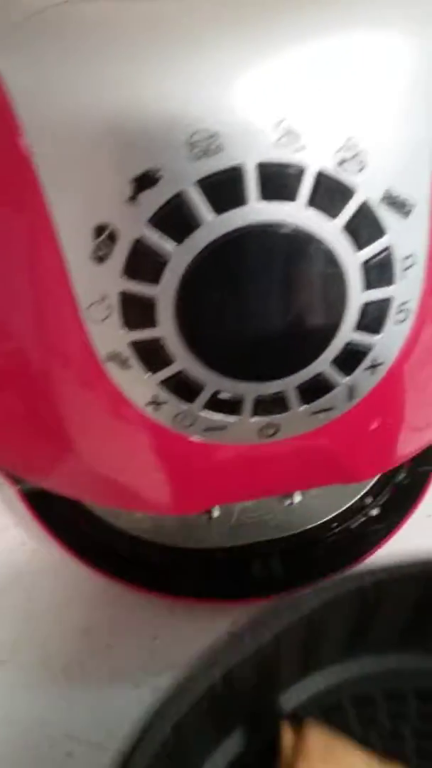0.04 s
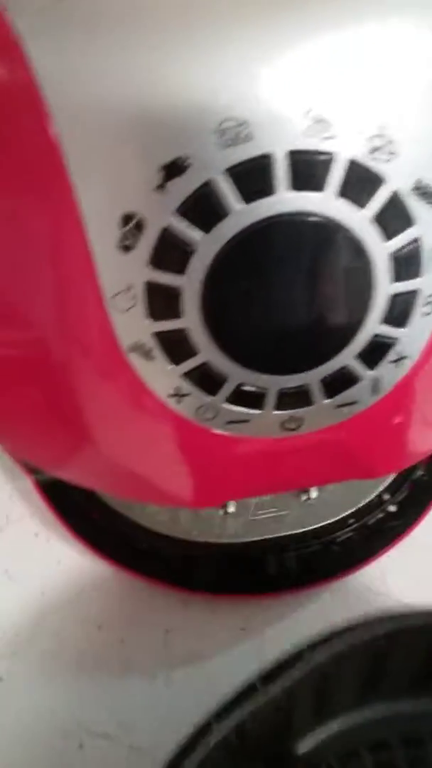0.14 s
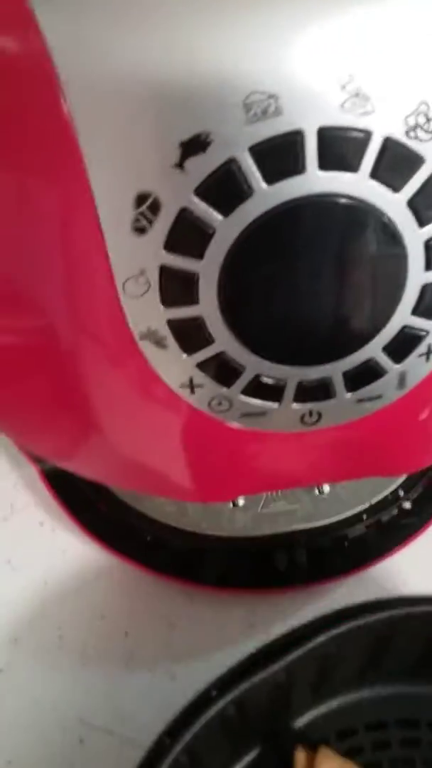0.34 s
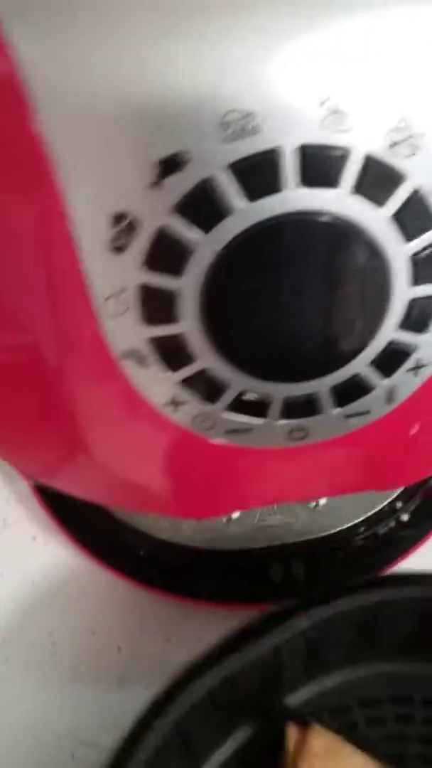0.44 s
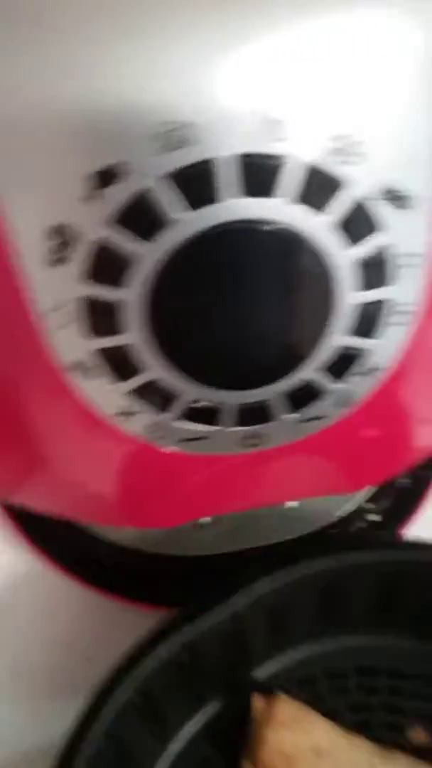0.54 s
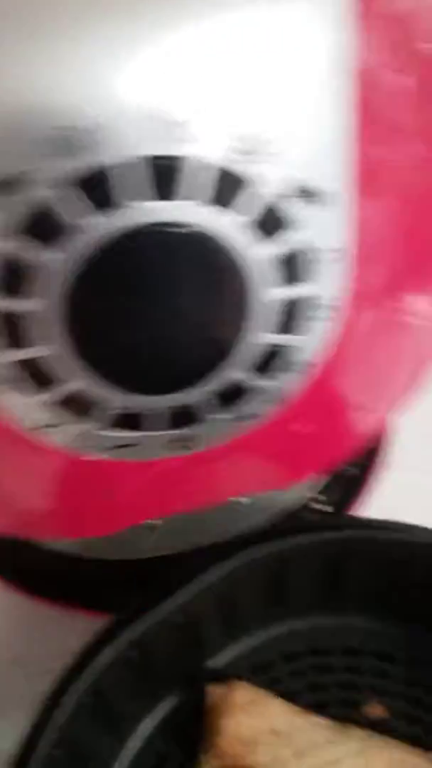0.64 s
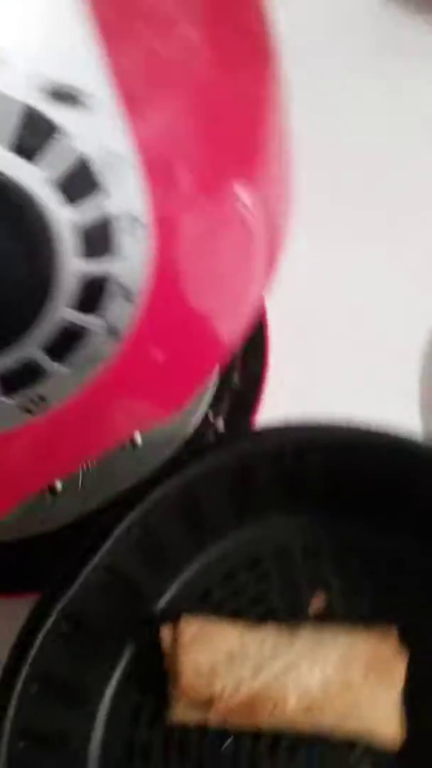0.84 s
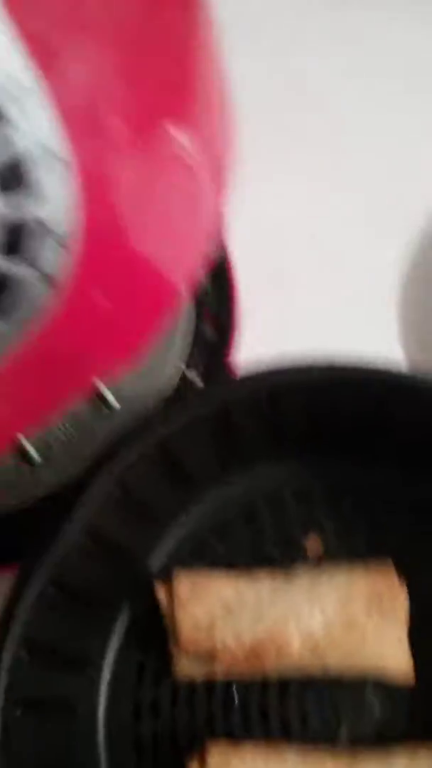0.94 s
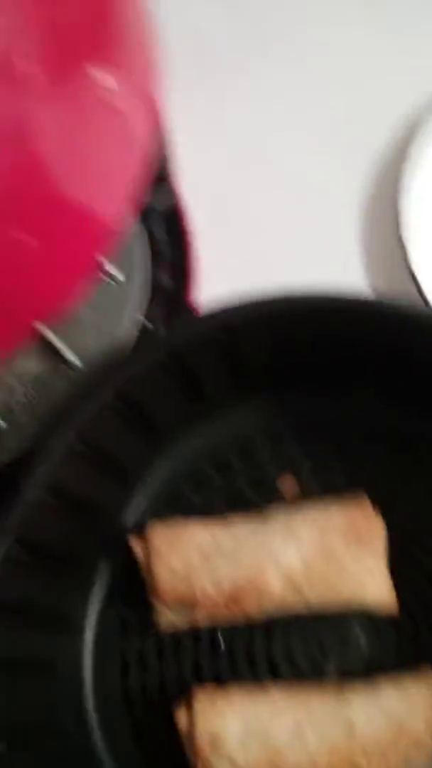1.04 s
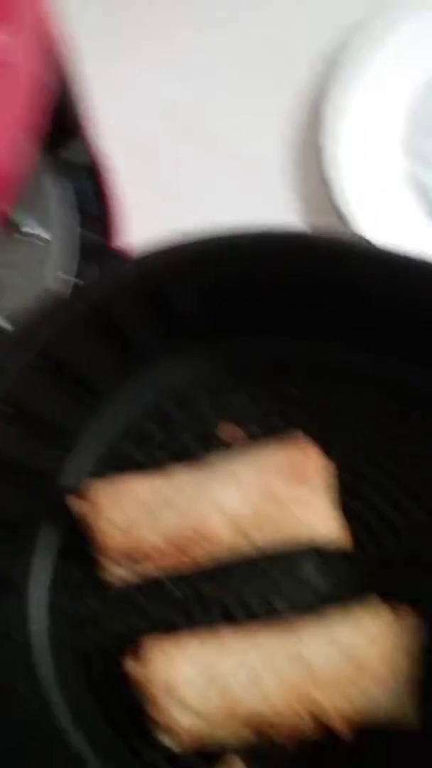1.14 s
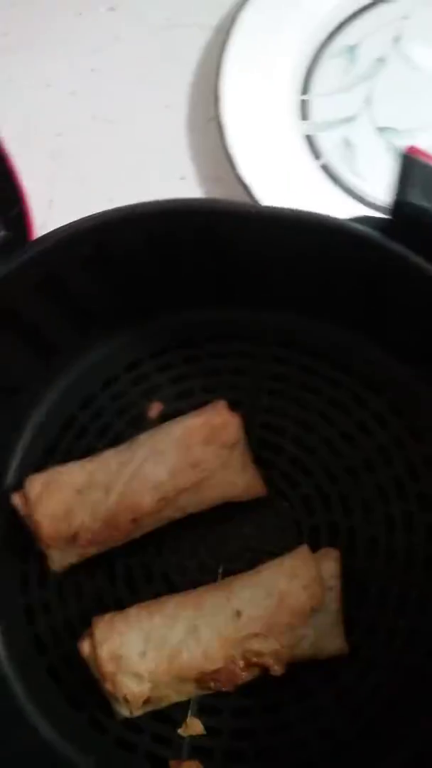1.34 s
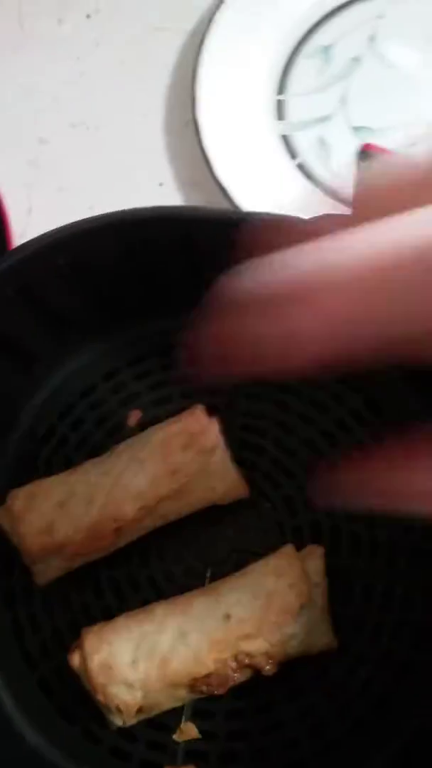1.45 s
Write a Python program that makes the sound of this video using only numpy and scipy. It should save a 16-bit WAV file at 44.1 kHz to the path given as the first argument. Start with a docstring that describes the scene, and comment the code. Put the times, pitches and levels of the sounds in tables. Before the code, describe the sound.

Dull knock and sharper clacks of a loaded fryer basket set down in a small kitchen.

```python
"""A faint shuffle of handling, then a dull knock: a loaded air-fryer basket lands on a counter in a
small kitchen, close to the microphone. The first edge rings the pan; the basket rocks with soft thumps
and settles as its loose insert clacks against the pan. A dry plastic tick and faint taps follow.
Behind it all are room noise, a low appliance hum and a thin steady whine."""
import sys
import numpy as np
from scipy import signal
from scipy.fft import rfft, irfft
from scipy.io import wavfile

SR = 44100
rng = np.random.default_rng(int(sys.argv[2]) if len(sys.argv) > 2 else 0)


def master_out(mix):
    """Clip the mix to full scale and print it as 16-bit PCM to the path in sys.argv[1]."""
    frames = np.transpose(np.atleast_2d(mix))
    ceiling = np.clip(frames, -1, 1)
    pcm = np.round(ceiling * 32767).astype(np.int16)
    wavfile.write(sys.argv[1], SR, pcm)


N = 66150

KNOCK_S, KNOCK_DB = 0.2315, -19.5
SECOND_EDGE_S, DAMPING_T60_S = 0.38, 0.95
# The knock's dense ring, heard up close. Each row: frequency in Hz, relative level in dB.
KNOCK_SPECTRUM = [(30, -19), (70, -7.5), (120, 1), (380, -1), (520, 0.5), (1100, -10.5), (1400, -19.5),
                  (1750, -7), (2200, -21), (2800, -19.5), (3300, -13.5), (4200, -19.5), (6400, -10),
                  (8300, -34.5), (16000, -44)]
def knock():
    """One edge hits the counter and rings the pan; the second comes down and damps the pan's modes."""
    out = np.zeros(N)
    add(out, KNOCK_S, pan_ring(knocked=True))
    out *= amp(-60 * np.maximum(clock() - SECOND_EDGE_S, 0) / DAMPING_T60_S)
    dense_ring = dying(noise(KNOCK_SPECTRUM), KITCHEN_DECAY) * rise(0.0004)
    add(out, KNOCK_S, amp(KNOCK_DB) * dense_ring)
    return out


# The pan's modes. Each entry: frequency in Hz.
PAN_MODE_HZ = [105, 130, 171.5, 224, 270, 366, 512, 641, 695, 717, 791, 895, 1064, 1198, 1384, 1658, 1707,
               1758, 1808, 1875, 2358, 3343]
# How those modes ring. Each row: level in the knock in dB, relative level in a clack in dB,
# t60 in seconds, build-up in seconds.
PAN_RESPONSE = [(-20, -29, 0.87, 0.0083), (-17.5, -23, 0.32, 0.0013), (-14, -25.5, 0.77, 0.013),
                (-13, -20, .38, 0.0029), (-32, -30, 0.39, .005), (-8, -27, 0.2, 0.00068),
                (-26, -21.5, .12, .002), (-14.5, -61.5, .6, 0.026), (-16, -33, .55, .03),
                (-31.5, -22.5, 0.23, 0.005), (-32.5, -27, 0.36, 0.012), (-40.5, -37, 0.54, .008),
                (-25, -42, 0.18, 0.0021), (-26, -38.5, 0.51, 0.014), (-52, -34.5, 0.21, 0.0023),
                (-23, -54, 0.38, 0.018), (-29.5, -44, 0.48, .008), (-33, -47, .3, .005),
                (-28, -47.5, .3, 0.0058), (-34.5, -38.5, .35, 0.0054), (-37, -41, 0.43, 0.007),
                (-30, -45, 0.28, 0.0087)]
def pan_ring(knocked):
    """The pan's modes, each building up at its own pace; the contact point sets their levels."""
    return sum(modes([(hz, knock_db if knocked else clack_db, t60)]) * rise(build_s)
               for hz, (knock_db, clack_db, t60, build_s) in zip(PAN_MODE_HZ, PAN_RESPONSE))


THUMP_PEAK_S, HOLLOW_HZ, THUMP_ROOM_DB = 0.0044, 358.6, -13
# The basket's low thumps on the counter: the first as its first edge lands, the rest as it rocks. Each row:
# start in seconds, level in dB, pitch in Hz, # relative level of the hollow overtone in dB.
COUNTER_THUMPS = [(0.2354, -3, 155, -8), (.372, -25, 177, 4.5), (.386, -10.5, 99, -24),
                  (0.3971, -9.5, 114, -9), (0.4529, -5.5, 139.5, -10), (.556, -12, 145, -20),
                  (.592, -22, 106, -9.5), (0.629, -19, 136, -13), (0.6382, -12.5, 135, -16.5),
                  (.701, -21.5, 147.4, -44)]
def thumps():
    """The weight lands and rocks on the counter: a few low cycles each time, and the kitchen answers."""
    out, t = np.zeros(N), clock()
    age = t / THUMP_PEAK_S
    swell = (age * np.exp(1 - age)) ** 2
    for start, db, hz, hollow_db in COUNTER_THUMPS:
        hollow = amp(hollow_db) * np.sin(2 * np.pi * HOLLOW_HZ * t)
        swing = hollow - np.sin(2 * np.pi * hz * t)
        add(out, start, amp(db) * swell * swing)
    return out + amp(THUMP_ROOM_DB) * kitchen(out)


# The loose insert's bright modes. Each entry: frequency in Hz.
INSERT_MODE_HZ = [2706, 3089, 5008, 5830, 6050, 6202, 6307, 6577]
# How those modes ring. Each row: relative level in dB, t60 in seconds.
INSERT_RESPONSE = [(-29.5, 0.16), (-21.5, 0.14), (-14.5, 0.054), (-37, 0.11), (-29.5, .22), (-35.5, 0.19),
                   (-36, 0.19), (-17, 0.068)]
# The noise of a clack. Each row: frequency in Hz, relative level in dB.
CLACK_SPECTRUM = [(40, -18.5), (140, -1), (280, -1), (430, 1), (800, -0.5), (1500, -10.5), (2200, -6.5),
                  (3100, -3), (3800, -9.5), (5000, -6.5), (5500, -7), (6600, -0.5), (8500, -24),
                  (13500, -27), (16000, -30.5)]
# The insert settling, close to the microphone. Each row: start in seconds, levels of crack, ring,
# insert and pan in dB, tilt in dB per octave, low-pass cutoff in Hz.
INSERT_CLACKS = [(.376, -45, -34.5, -35, -40, -4, 6030), (.396, -52, -42, -30, -10.5, 8, 14000),
                 (.449, -14.5, -33, -30, -32, 5.5, 14630), (.4512, -11.5, -25.5, -2, 3, 0.5, 15000),
                 (.5515, -19, -31.5, -10.5, -11, 0.5, 14200), (.601, -28, -42.5, -38, -12, -6.5, 6900),
                 (.6632, -29, -42, -20.5, -22, 0, 5020), (.666, -26, -49, -54, -26.5, -1.5, 5130),
                 (.834, -40.5, -59, -41.5, -59, 3.5, 3200)]
def clacks():
    """The insert strikes the pan: a short crack, a longer ring and the modes of both parts."""
    out = np.zeros(N)
    pan = pan_ring(knocked=False)
    insert = modes(np.c_[INSERT_MODE_HZ, INSERT_RESPONSE]) * rise(0.0013)
    for start, crack_db, ring_db, insert_db, pan_db, tilt_db, cutoff_hz in INSERT_CLACKS:
        crack = amp(crack_db) * noise(CLACK_SPECTRUM, tilt_db) * fade(t60=0.041)
        ring = amp(ring_db) * dying(noise(CLACK_SPECTRUM, tilt_db), KITCHEN_DECAY)
        clack = rise(0.00073) * (crack + ring + amp(insert_db) * insert + amp(pan_db) * pan)
        add(out, start, filtered(clack, "lowpass", cutoff_hz))
    return out


TICK_S, SNAP_DB, TICK_TAIL_DB = 1.0925, -22.5, -52
# The snap, right beside the microphone. Each row: frequency in Hz, relative level in dB.
SNAP_SPECTRUM = [(60, -33.5), (110, -14), (200, 12.5), (600, -4), (1200, -2.5), (1700, -14.5), (3200, -4),
                 (4400, -24), (6500, 2.5), (9000, -7.5), (16000, 0)]
# How fast the snap dies. Each row: frequency in Hz, t60 in seconds.
SNAP_DECAY = [(200, 0.044), (1000, 0.098), (3000, 0.038), (6500, 0.0056), (15000, 0.0091)]
# The thud under the snap. Each row: frequency in Hz, level in dB, t60 in seconds.
THUD_MODES = [(198, -33.5, 0.044), (334, -34, 0.033), (982, -42, 0.047), (1280, -44.5, 0.036),
              (2025, -33.5, 0.013), (3200, -31, 0.015), (4820, -41, 0.008)]
# The tick coming back from the room. Each row: frequency in Hz, relative level in dB.
TICK_TAIL_SPECTRUM = [(100, -17.5), (400, -8), (1400, -9), (2600, -9), (4500, -12.5), (6500, 1),
                      (9000, -19), (16000, -26.5)]
def tick():
    """A close, heavily damped snap of plastic with a faint room tail."""
    out = np.zeros(N)
    snap = amp(SNAP_DB) * dying(noise(SNAP_SPECTRUM), SNAP_DECAY) * rise(0.000094)
    thud = modes(THUD_MODES)
    tail = amp(TICK_TAIL_DB) * dying(noise(TICK_TAIL_SPECTRUM), KITCHEN_DECAY) * rise(0.0036)
    add(out, TICK_S, filtered(snap + thud + tail, "highpass", hz=172, order=4))
    return out


TAP_TAIL_DB = -14.5
# The noise of a tap. Each row: frequency in Hz, relative level in dB.
TAP_SPECTRUM = [(100, -23.5), (550, 4), (1000, -5), (1600, -5), (2300, -6), (3000, -12.5), (4300, -17.5),
                (6400, -5.5), (8000, -18), (16000, -25.5)]
# Faint handling at the counter. Each row: start in seconds, level in dB, tilt in dB per octave,
# low-pass cutoff in Hz.
HANDLING_TAPS = [(.131, -45.5, 3, 6100), (.806, -42.5, -11, 1020), (1.3571, -41.5, 1.5, 3720),
                 (1.392, -41, 2, 8000)]
def taps():
    """Light touches, each a short burst with a room tail."""
    out = np.zeros(N)
    for start, db, tilt_db, cutoff_hz in HANDLING_TAPS:
        touch = noise(TAP_SPECTRUM, tilt_db) * fade(t60=0.035)
        tail = amp(TAP_TAIL_DB) * dying(noise(TAP_SPECTRUM, tilt_db), KITCHEN_DECAY)
        tap = (touch + tail) * rise(0.00063)
        add(out, start, amp(db) * filtered(tap, "lowpass", cutoff_hz))
    return out


CARRY_DB = -50
# The basket on its way to the counter. Each row: frequency in Hz, relative level in dB.
CARRY_SPECTRUM = [(40, -3), (110, 12.5), (250, -10.5), (500, -5.5), (1200, -15.5), (3000, -23.5),
                  (6500, -25), (9000, -29), (16000, -37)]
def carrying():
    """Handling noise that fades out between the landing of the first edge and the second."""
    held = np.clip((SECOND_EDGE_S - clock()) / (SECOND_EDGE_S - KNOCK_S), 0, 1)
    return amp(CARRY_DB) * noise(CARRY_SPECTRUM) * held


# How long sound rings in the small kitchen. Each row: frequency in Hz, t60 in seconds.
KITCHEN_DECAY = [(80, 0.31), (200, 0.57), (500, 0.41), (1500, 0.62), (3000, 0.41), (6500, 0.18),
                 (9000, 0.37), (15000, 0.18)]
def kitchen(x):
    """Diffuse reflections of the small room."""
    tail = dying(rng.standard_normal(N), KITCHEN_DECAY) * rise(0.02)
    return signal.fftconvolve(x, tail / np.linalg.norm(tail))[:N]


ROOM_DB, WHINE_HZ, WHINE_DB = -52, 14751, -57
# The kitchen's room tone at the microphone. Each row: frequency in Hz, relative level in dB.
ROOM_SPECTRUM = [(25, -18.5), (70, 0.5), (110, 1.5), (160, -6), (230, 0.5), (300, -15.5), (420, -10),
                 (560, -23), (850, -17), (1300, -29.5), (2000, -33), (3200, -34.5), (4600, -34.5),
                 (5600, -31), (6400, -20.5), (7600, -34), (10000, -36.5), (15000, -32.5)]
# An appliance humming in the background. Each row: frequency in Hz, rms level in dB.
HUM_TONES = [(113, -63.5), (188.4, -55), (231.5, -58.5), (420, -70), (804, -69), (925.9, -68)]
def room_tone():
    """Steady room noise, a thin whine and a wavering appliance hum."""
    t = clock()
    whine = amp(WHINE_DB) * np.sqrt(2) * np.sin(2 * np.pi * WHINE_HZ * t)
    out = amp(ROOM_DB) * noise(ROOM_SPECTRUM) + whine
    for hz, db in HUM_TONES:
        waver = 0.38 * noise([(3, 0), (12, -12), (40, -70), (200, -140)])  # slow phase drift, radians
        phase = 2 * np.pi * (hz * t + rng.random()) + waver
        out += amp(db) * np.sqrt(2) * np.sin(phase)
    return out


def amp(db):
    """Decibels to gain."""
    return 10 ** (np.asarray(db) / 20)


def clock():
    """Time of each sample in seconds."""
    return np.arange(N) / SR


def rise(seconds):
    """Soft attack with the given time constant."""
    return 1 - np.exp(-clock() / seconds)


def fade(t60):
    """Exponential decay, 60 dB down after t60 seconds."""
    return np.exp(-np.log(1000) * clock() / t60)


def modes(rows):
    """Dying sines from rows of (Hz, dB, t60 in seconds)."""
    return sum(amp(db) * fade(t60) * np.sin(2 * np.pi * hz * clock()) for hz, db, t60 in rows)


def read(points, hz):
    """Reads a table on a log-frequency axis."""
    freqs, values = np.transpose(points)
    return np.interp(np.log(hz + 1), np.log(freqs + 1), values)


def noise(spectrum, tilt_db=0):
    """Noise of rms 1 with a given spectrum, tilted by tilt_db per octave about 3 kHz."""
    hz = np.fft.rfftfreq(N, 1 / SR)
    octaves = np.log2(np.clip(hz, 300, 12000) / 3000)
    phases = np.exp(2j * np.pi * rng.random(len(hz)))
    x = irfft(phases * amp(read(spectrum, hz) + tilt_db * octaves), N)
    return x / np.sqrt(np.mean(x ** 2) + 1e-20)


def dying(x, decay):
    """Lets each octave band die at its own speed."""
    centres = np.geomspace(62.5, 16000, 9)
    hz, spectrum = np.fft.rfftfreq(N, 1 / SR), rfft(x)
    out = np.zeros(N)
    for centre, weights in zip(centres, np.eye(len(centres))):
        band = irfft(spectrum * read(np.c_[centres, weights], hz), N)
        out += band * fade(read(decay, centre))
    return out


def filtered(x, kind, hz, order=2):
    """A plain low-pass or high-pass."""
    return signal.sosfilt(signal.butter(order, hz, kind, fs=SR, output="sos"), x)


def add(mix, start, sound):
    """Mixes a sound in at a start time in seconds."""
    part = mix[round(start * SR):][:len(sound)]
    part += sound[:len(part)]


def scene():
    """The basket and the kitchen, heard from one microphone close to the counter."""
    return (carrying() + knock() + thumps() + clacks() + tick() + taps() + room_tone())[None]


LOW_CUT_HZ, BAND_LIMIT_HZ = 85, 15900
def record(dry):
    """The microphone's bass roll-off and the band limit."""
    thin = filtered(dry, "highpass", LOW_CUT_HZ)
    band_limit = signal.firwin(255, BAND_LIMIT_HZ, window=("kaiser", 9), fs=SR)
    return signal.oaconvolve(thin, band_limit[None], "same")


dry = scene()
out = record(dry)
master_out(out)
```